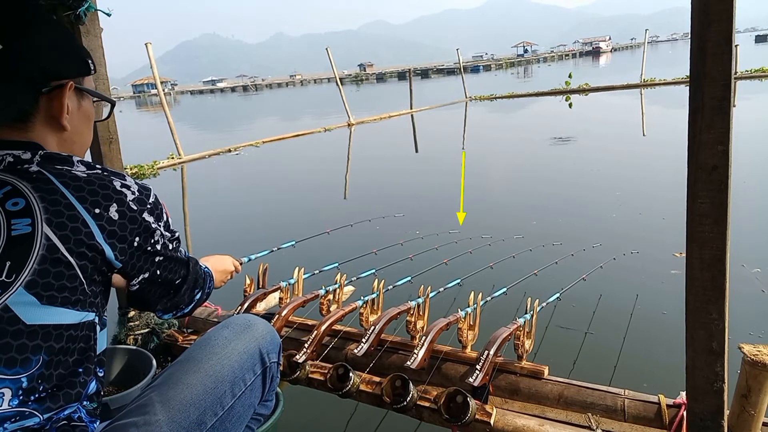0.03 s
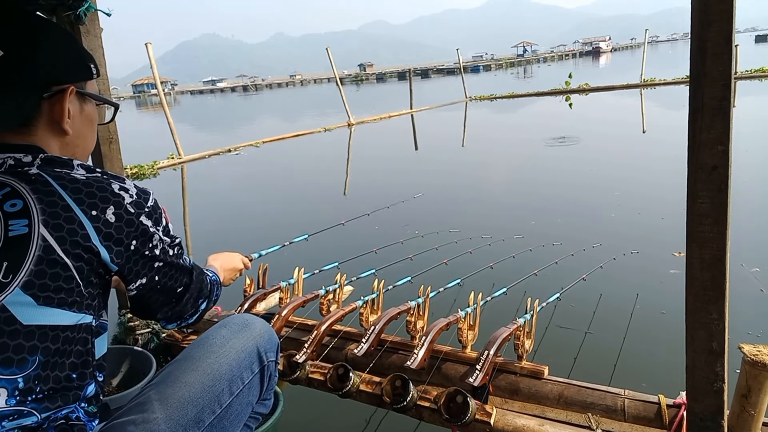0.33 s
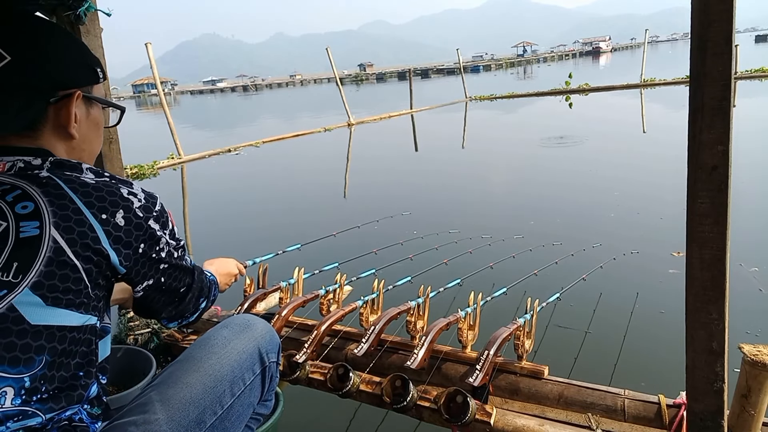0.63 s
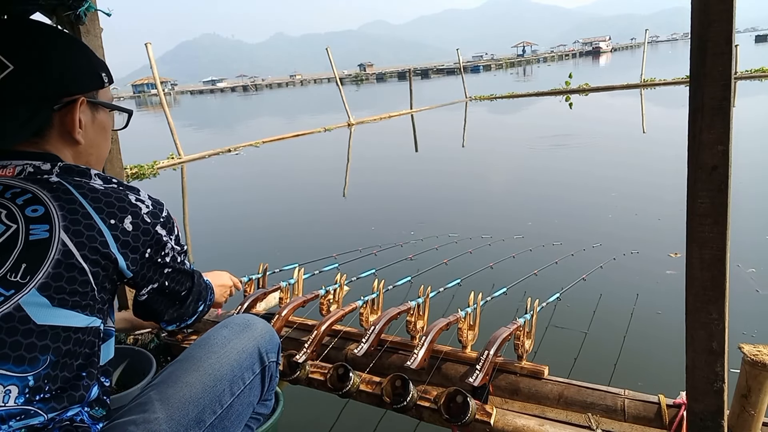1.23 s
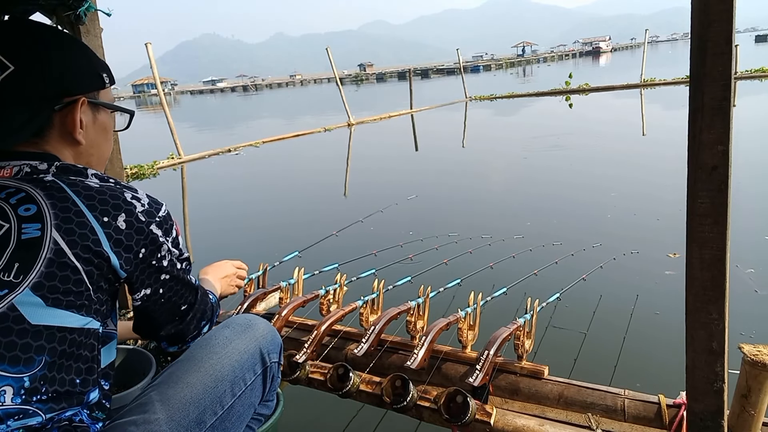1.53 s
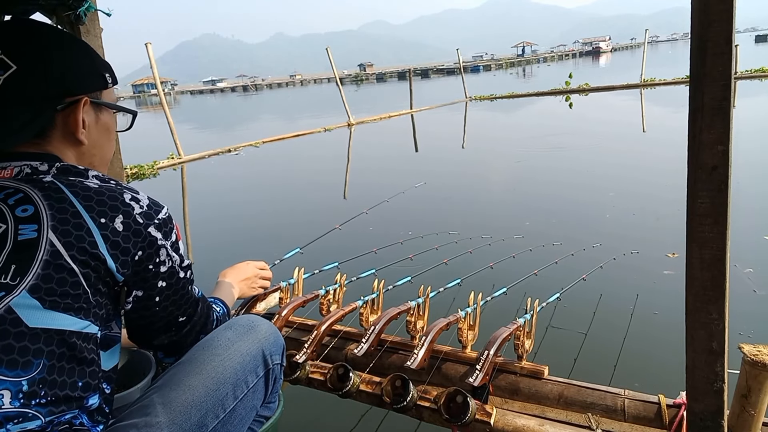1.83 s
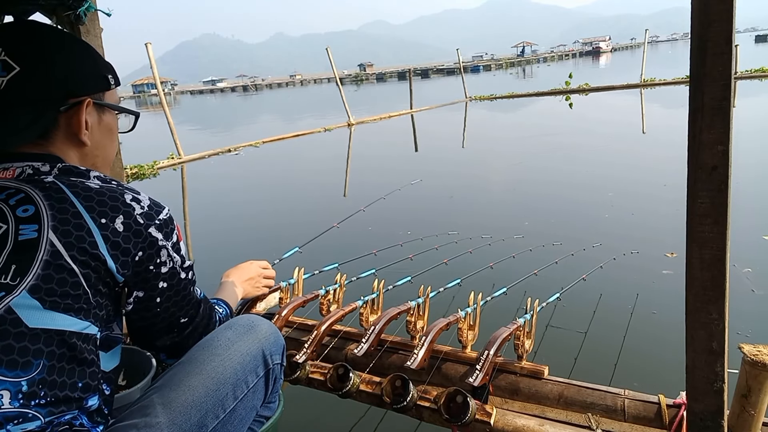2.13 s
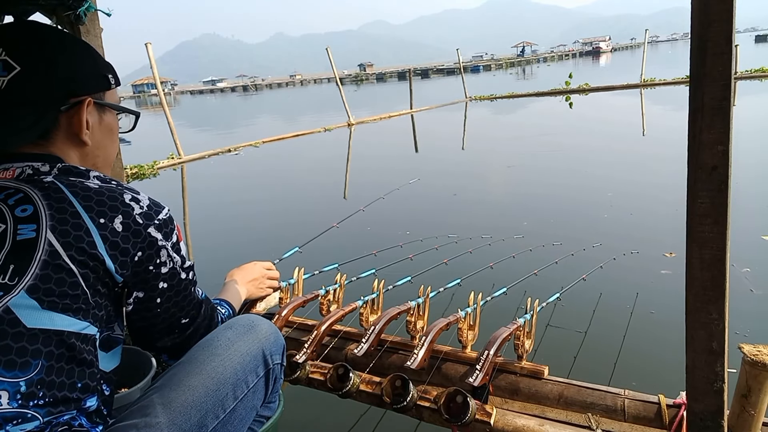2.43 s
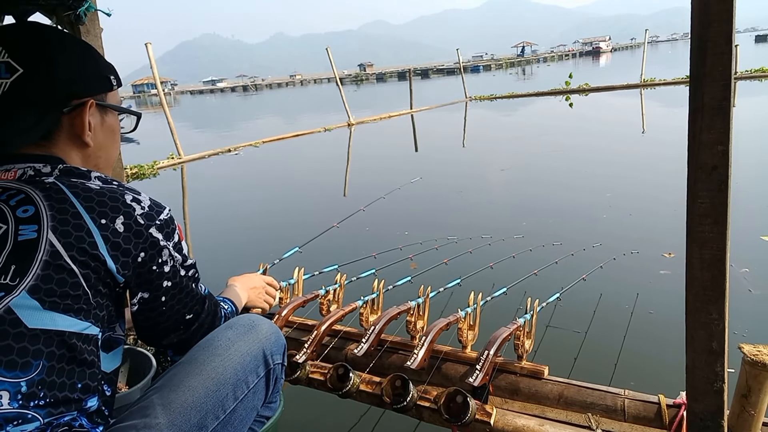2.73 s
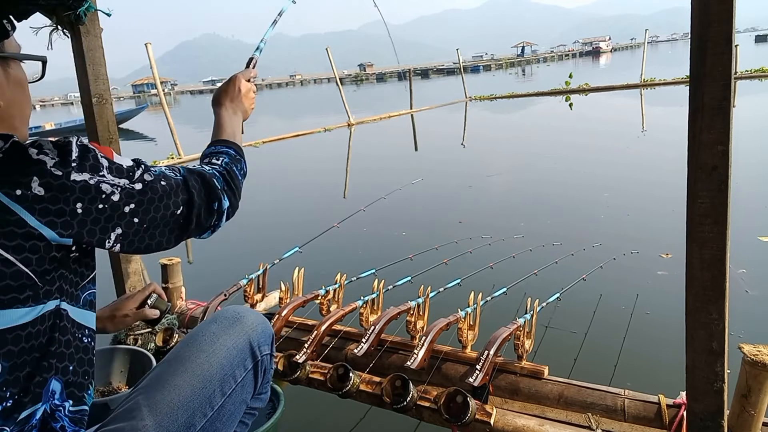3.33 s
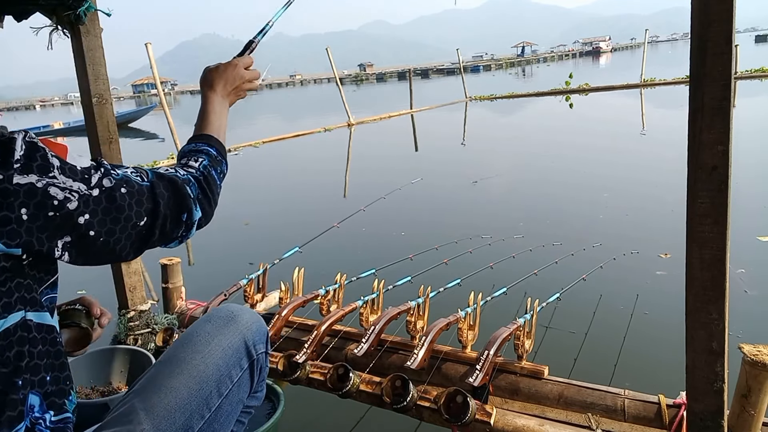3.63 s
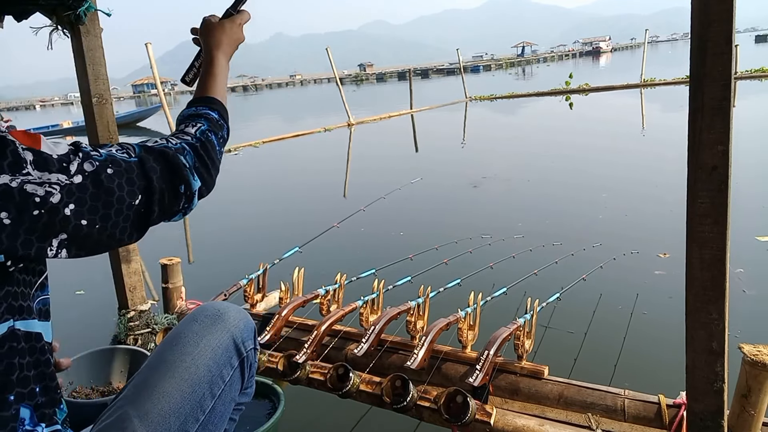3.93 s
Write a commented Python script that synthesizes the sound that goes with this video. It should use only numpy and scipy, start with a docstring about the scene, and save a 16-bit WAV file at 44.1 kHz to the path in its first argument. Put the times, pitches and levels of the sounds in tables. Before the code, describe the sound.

A fishing rod swishes once, close by, with a quick whistling zip, following a few soft knocks of tackle on a bamboo rack. Small birds chirp faintly throughout, over open lake air and the low hum of distant boat engines.

```python
"""A fishing rod and line whistle through the air as an angler on a lake platform strikes.
They shed little swirls of air, so the pitch shoots up and slides down with their speed.
Before that, tackle knocks on a bamboo rack, the rod handle scrapes and a sleeve rustles.
Small birds call in falling notes over the hiss of open air and two distant boat engines."""
import sys
import numpy as np
from scipy import signal
from scipy.fft import rfft, irfft
from scipy.io import wavfile

SR = 44100
rng = np.random.default_rng(int(sys.argv[2]) if len(sys.argv) > 2 else 0)


def to_wav(s):
    """Save 16-bit WAV."""
    ch = np.atleast_2d(s).T  # columns
    pcm = np.round(np.clip(ch, -1, 1) * 32767)  # PCM
    wavfile.write(sys.argv[1], SR, pcm.astype(np.int16))


N = 176400
T = np.arange(N) / SR


def amp(db):
    """Turns decibels into a number to multiply by."""
    return 10 ** (np.asarray(db) / 20)


def unit(x):
    """Scales a signal to an average strength (rms) of 1."""
    return x / np.sqrt(np.mean(x ** 2) + 1e-20)


def add(mix, start_s, sound):
    """Mixes a sound in at a given time."""
    part = mix[..., round(start_s * SR):][..., :sound.shape[-1]]
    part += sound[..., :part.shape[-1]]


def bump(peak_s, width_s):
    """A smooth rise to 1 and back."""
    return np.exp(-((T - peak_s) / width_s) ** 2)


def drift(rate_hz):
    """A smooth random wobble, up to about this rate."""
    return unit(irfft(rfft(rng.standard_normal(N)) * np.exp(-(np.fft.rfftfreq(N, 1 / SR) / rate_hz) ** 2), N))


def noise(spectrum, tilt_db=0):
    """Noise shaped by a table of frequencies and levels; the tilt brightens it per octave."""
    hz, db = np.transpose(spectrum)
    octave = np.log2(np.fft.rfftfreq(N, 1 / SR) + 1)
    gain = amp(np.interp(octave, np.log2(hz), db) + tilt_db * octave)
    return unit(irfft(rfft(rng.standard_normal(N)) * gain, N))


def wide_noise(spectrum, spread, tilt_db=0):
    """Stereo noise; more spread makes left and right less alike."""
    return unit(noise(spectrum, tilt_db) + spread * noise(spectrum, tilt_db) * np.array([[1], [-1]]))


def pan(x, left_db):
    """Makes the left side this much louder than the right."""
    return x * amp([[left_db / 2], [-left_db / 2]])


def below(x, edge_hz):
    """The part of a sound under a frequency."""
    return signal.sosfiltfilt(signal.butter(2, edge_hz, fs=SR, output="sos"), x)


# tone of the air, shared by both sides and differing between them (frequency [Hz], level [dB])
AIR_SHARED = [(20, -22), (40, -24), (62, -11), (100, 4), (140, 5), (175, -1), (280, -8.5), (450, -13.5),
              (525, -14.5), (630, -7), (900, -14.5), (1300, -23.5), (1600, -21.5), (1880, -13.5),
              (2130, -24.5), (2400, -17), (2680, -26), (2950, -20), (3400, -25.5), (3750, -28.5),
              (4250, -36), (5100, -30), (5550, -28.5), (6200, -36.5), (6800, -47), (7450, -30),
              (8050, -35.5), (8650, -26), (9450, -41.5), (9800, -33.5), (12000, -39.5), (15200, -44.5)]
AIR_SIDES = [(20, -10), (60, -2), (120, 6.5), (250, -4), (450, -2.5), (800, -3), (1200, -6.5), (1480, -1.5),
             (2250, -13), (2550, -14.5), (2950, -12), (3400, -16), (3780, -16), (4200, -20), (4600, -18),
             (5500, -22.5), (7900, -25), (8750, -18.5), (9900, -23.5), (11000, -26), (11700, -27.5),
             (15200, -34)]
# slow swell of the air above its rumble (time [s], boost [dB])
AIR_SWELL = [(0, 0), (1.4, 0.5), (2.0, .5), (2.7, 1), (3.6, 1.5), (4, 2.5)]

def lake_air():
    """Open air rumbles and hisses; its highest part ticks along with the steady engine."""
    air = amp(-44.5) * noise(AIR_SHARED) + amp(-49.5) * noise(AIR_SIDES) * np.array([[1], [-1]])
    rumble, body = below(air, edge_hz=400), below(air, edge_hz=3200)
    ticking_hiss = engine_clatter() * (air - body)
    swell = amp(np.interp(T, *np.transpose(AIR_SWELL)) + .7 * drift(6.4))
    return rumble + swell * (body - rumble + ticking_hiss)


# ticks in each engine cycle (place in the cycle [0-1], level relative to the hiss [dB])
ENGINE_TICKS = [(0.92, 0), (0.15, -2), (.46, -5.5)]
FIRING_HZ = 21.42

def engine_clatter():
    """A loudness curve for the hiss: the engine ticks three times a cycle, a little unevenly."""
    ticks, width_cycles = np.zeros(N), .076
    for place, db in ENGINE_TICKS:
        cycles_away = (T * FIRING_HZ - place + .5) % 1 - .5
        ticks += amp(db) * np.exp(-(cycles_away / width_cycles) ** 2)
    return unit(1 + ticks * amp(2.5 * drift(30)))


# tones in the engine's drone (multiple of the firing rate, level [dB])
ENGINE_TONES = [(3, -61), (4, -58.5), (5, -50), (6, -49.5), (7, -53), (8, -69.5), (9, -58), (10, -63),
                (11, -61), (12, -61), (13, -73), (14, -65), (15, -61), (19, -71.5), (23, -65), (29, -61.5),
                (33, -66.5)]
FADING = .38  # how strongly the engines waver across the water

def steady_engine():
    """A far engine fires at an almost even rate, making a stack of tones that fade in and out."""
    phase = 2 * np.pi * np.cumsum(FIRING_HZ * (1 + .0019 * drift(1.99))) / SR
    drone = np.zeros(N)
    for multiple, db in ENGINE_TONES:
        level = amp(db) * (1 + FADING * drift(9.1))
        drone += level * np.cos(multiple * phase + FADING * drift(5))
    return np.sqrt(2) * drone


# hum of the second engine (time [s], pitch [Hz], level [dB])
ENGINE_HUM = [(0, 146, -45.5), (.25, 142.9, -44.5), (0.549, 135, -45.5), (.9, 129.2, -47.5),
              (1.25, 120.7, -65), (1.65, 111.4, -48), (2.0, 112.8, -57), (2.15, 135.8, -45),
              (2.55, 131.1, -40), (2.8, 120, -55), (3.3, 110, -46), (3.7, 112, -48.5), (4, 111.6, -51.5)]

def throttling_engine():
    """Another far engine changes speed, so its hum slides up and down."""
    times, hz, db = np.transpose(ENGINE_HUM)
    level = amp(np.interp(T, times, db)) * (1 + FADING * drift(6.7))
    phase = 2 * np.pi * np.cumsum(np.interp(T, times, hz)) / SR
    return np.sqrt(2) * level * np.sin(phase)


# bird notes (time [s], length [s], start pitch [Hz], end pitch [Hz], level [dB])
BIRD_NOTES = [(.13, 0.1, 4400, 3170, -62), (0.185, 0.063, 3200, 2490, -55.5),
              (0.202, 0.055, 3500, 3050, -56), (0.267, 0.09, 4300, 3630, -63),
              (0.512, 0.099, 4550, 3780, -68), (0.562, .03, 4100, 3620, -58),
              (0.788, 0.058, 4330, 3980, -57.5), (.835, .045, 4100, 3550, -55),
              (.86, 0.076, 3300, 2550, -53.5), (1.204, 0.056, 4800, 4240, -58.5),
              (1.263, 0.034, 4230, 3560, -51.5), (1.272, 0.061, 3500, 2670, -50.5),
              (1.331, 0.075, 2600, 2200, -59), (1.525, 0.036, 4000, 3620, -55.5),
              (1.663, .065, 4450, 3530, -57), (1.719, 0.088, 2850, 2350, -59.5),
              (1.775, .12, 4750, 3920, -65), (1.806, 0.08, 3550, 2880, -58.5), (1.87, .08, 3900, 2700, -60),
              (2.035, .05, 3400, 2895, -60), (2.317, .07, 4800, 3700, -64), (2.35, 0.12, 3500, 2510, -53),
              (2.36, .15, 3000, 2215, -55.5), (2.515, 0.029, 3100, 2850, -52.5),
              (2.656, .05, 3850, 3700, -59), (2.672, 0.074, 3300, 2900, -55),
              (2.745, 0.031, 3170, 2890, -57), (2.788, 0.039, 4400, 3530, -56),
              (2.815, 0.066, 3350, 2600, -48), (2.861, .07, 2750, 2350, -57), (3.0, 0.049, 3550, 2850, -55),
              (3.078, 0.064, 4750, 4020, -63), (3.135, .06, 3600, 2787, -58.5),
              (3.487, 0.083, 5000, 5320, -58.5), (3.521, .07, 3450, 2800, -57),
              (3.665, 0.044, 4300, 3700, -64.5), (3.698, 0.073, 3300, 2600, -50.5),
              (3.785, .03, 4400, 4040, -60.5), (3.81, 0.057, 3450, 2800, -56.5)]

def birds():
    """Whistled notes, nearly all falling, broken up by distance and blurred by echoes from the shore."""
    calls, waver = np.zeros(N), .014 * drift(160)
    for start_s, length_s, start_hz, end_hz, db in BIRD_NOTES:
        progress = np.arange(0, length_s, 1 / SR) / length_s
        hz = start_hz * (end_hz / start_hz) ** progress * (1 + waver[round(start_s * SR):][:len(progress)])
        level = amp(db) * np.sqrt(2) * np.sin(np.pi * progress)
        add(calls, start_s, level * np.sin(2 * np.pi * np.cumsum(hz) / SR))
    calls *= unit(amp(3.5 * drift(60)))  # the loudness flickers
    t = T[:SR // 2]
    tail = rng.standard_normal((2, len(t))) * amp(-60 * t / .16)  # echoes drop 60 dB in 0.16 s
    echo = signal.fftconvolve(calls[None], tail / np.linalg.norm(tail[0]), axes=1)[:, :N]
    return pan(calls, left_db=5.5) + amp(-2) * echo


# knocks of tackle (time [s], level [dB], fade time [s], brightness [dB per octave])
TACKLE_KNOCKS = [(1.656, -34.5, 0.008, -1.2), (1.678, -47, 0.0054, 1), (2.001, -42, 0.0085, 1.5),
                 (2.007, -37.5, 0.015, -8.5), (2.250, -39.5, .010, -1.5), (2.622, -45, .014, 2),
                 (2.647, -30, 0.0073, 2), (2.653, -32.5, 0.0089, -3), (3.194, -38.5, 0.018, -2),
                 (3.524, -39.5, .012, -4.5)]
# tone of the bamboo rack (frequency [Hz], level [dB])
BAMBOO_TONE = [(120, -32), (250, -8.5), (390, 1.5), (520, -4), (630, -1.5), (750, -1.5), (920, 0),
               (1120, -4), (1310, -0.5), (1600, -10.5), (2050, -1.5), (2600, -9.5), (3400, -11.5),
               (4700, -19.5), (6500, -30.5), (15000, -38)]

def tackle_knocks():
    """Tackle hits the bamboo rack, which rings briefly; the platform adds a faint tail."""
    out = np.zeros((2, N))
    rise_s, tail_s = .00094, .046
    for start_s, db, fade_s, tilt_db in TACKLE_KNOCKS:
        shape = np.minimum(T / rise_s, 1) * (np.exp(-T / fade_s) + amp(-14.5) * np.exp(-T / tail_s))
        add(out, start_s, amp(db) * shape * wide_noise(BAMBOO_TONE, spread=.47, tilt_db=tilt_db))
    return pan(out, left_db=3)


# tone of the scraping handle (frequency [Hz], level [dB])
SCRAPE_TONE = [(900, -23), (1700, -9), (2030, 4), (2350, -20), (4000, -30)]

def handle_scrape():
    """The rod handle slides on its rest with a short, hollow scrape."""
    level = amp(-50 + 2.4 * drift(200)) * bump(peak_s=2.14, width_s=.029)
    return pan(level * wide_noise(SCRAPE_TONE, spread=.48), left_db=3)


# brushes of the sleeve (time [s], width [s], level [dB])
SLEEVE_BRUSHES = [(2.146, 0.0094, -47), (2.164, .006, -41.5), (2.655, 0.021, -51), (3.235, 0.022, -52),
                  (3.257, 0.029, -37), (3.417, .005, -48), (3.463, .005, -46), (3.482, .005, -45)]
# tone of the cloth (frequency [Hz], level [dB])
CLOTH_TONE = [(300, -11), (1200, 5), (2000, 10), (3000, -4), (6000, -8), (10000, -8), (14000, -6),
              (15500, -28)]

def sleeve():
    """Cloth rubs in brief, grainy bursts."""
    level = sum(amp(db) * bump(peak_s, width_s) for peak_s, width_s, db in SLEEVE_BRUSHES)
    grainy_hiss = unit(wide_noise(CLOTH_TONE, spread=1) * amp(3.9 * drift(600)))
    return pan(level * grainy_hiss, left_db=.5)


# the whistle's pitch, which follows the rod's speed (time [s], pitch [Hz])
SWING_PITCH = [(3.17, 250), (3.21, 439), (3.25, 825), (3.285, 1390), (3.301, 1757), (3.32, 1509),
               (3.35, 1186), (3.44, 582), (3.55, 243)]
FLUTTER_HZ = 110  # how fast the whistle's pitch and loudness tremble

def rod_swing():
    """Rod and line speed up and slow down, making a whistle, a rush of air and a low wake."""
    times, hz = np.transpose(SWING_PITCH)
    pitch = np.exp(np.interp(T, times, np.log(hz))) * (1 + .002 * drift(FLUTTER_HZ))
    speed = pitch / hz.max()  # 1 is top speed
    moving = np.clip(np.minimum(T - times[0], times[-1] - T) / .018, 0, 1)  # 18 ms fade in and out
    return pan(moving * (whistle(pitch, speed) + air_rush(speed)) + wake(), left_db=1.6)


def flutter(rate_hz):
    """A random shake of a tone's strength and timing, which makes it breathy."""
    return drift(rate_hz) + 1j * drift(rate_hz)


# tones of the whistle, with levels given for top speed
# (multiple of the pitch, level while speeding up [dB], level while slowing [dB], power of speed)
WHISTLE_TONES = [(1, -8.5, -10, 2.91), (2, -28.5, -35.5, 3.1), (3, -18, -7, 3.62), (4, -56.5, -50, 1.6),
                 (5, -63.5, -41, 1.1), (7, -59.5, -40.5, 1.83)]

def whistle(pitch, speed):
    """Swirls of air peel off rod and line as tones; most high ones gain as the rod starts to slow."""
    left_lead_s = .000018  # the sound reaches the left side first
    phase = 2 * np.pi * (np.cumsum(pitch) / SR + np.array([[left_lead_s], [0]]) * pitch)
    slowing = .5 + .5 * np.tanh((T - 3.312) / .006)  # goes from 0 to 1 around 3.312 s
    flare_db = 3.8 * bump(peak_s=3.318, width_s=.0065)
    out = np.zeros((2, N))
    for multiple, early_db, late_db, power in WHISTLE_TONES:
        is_third = multiple == 3  # this tone flares briefly and turns breathier
        level = amp(early_db + (late_db - early_db) * slowing + is_third * flare_db) * speed ** power
        breath = amp(-38) * flutter(500) + is_third * slowing * amp(-23) * flutter(900)
        roughness = 1 + .035 * drift(FLUTTER_HZ) / speed + breath
        out += np.sqrt(2) * level * (roughness * np.exp(1j * multiple * phase)).imag
    return out


# tone of the rushing air (frequency [Hz], level [dB])
RUSH_TONE = [(150, -10), (600, -7.5), (2000, -10.5), (3000, 5.5), (4500, 5.5), (6500, -2.5), (9000, -3),
             (12000, -7), (13500, -13.5), (15500, -23.5)]

def air_rush(speed):
    """Air hisses past the rod, just behind its motion; the highest part needs more speed."""
    late_speed = np.interp(T - .016, T, speed)  # 16 ms behind
    hiss = wide_noise(RUSH_TONE, spread=.507)
    body = below(hiss, edge_hz=6500)
    return amp(-34) * (late_speed ** 1.96 * body + late_speed ** 3 * (hiss - body))


# tone of the air stirred up by the swing (frequency [Hz], level [dB])
WAKE_TONE = [(15, 0.5), (35, -1.5), (70, -8.5), (200, -18), (1000, -61), (3000, -100)]

def wake():
    """Air stirred up by the swing arrives as a soft, low puff."""
    return amp(-55) * bump(peak_s=3.36, width_s=.07) * noise(WAKE_TONE)


def scene():
    """The angler's sounds, with the lake around them."""
    angler = rod_swing() + tackle_knocks() + handle_scrape() + sleeve()
    return angler + birds() + steady_engine() + throttling_engine() + lake_air()


def record(dry):
    """Cuts away the very highest sounds, above 15550 Hz."""
    low_pass = signal.firwin(511, 15550, window=("kaiser", 9), fs=SR)
    return signal.oaconvolve(dry, low_pass[None], "same")


dry = scene()
out = record(dry)
to_wav(out)
```